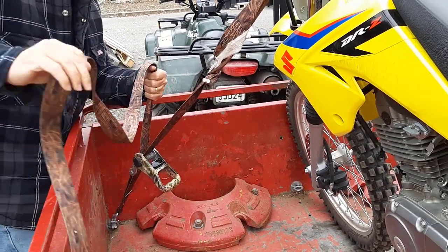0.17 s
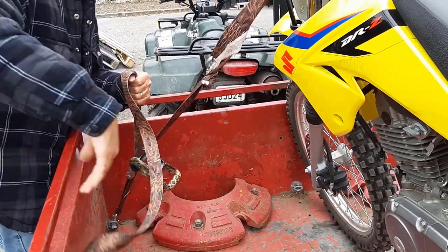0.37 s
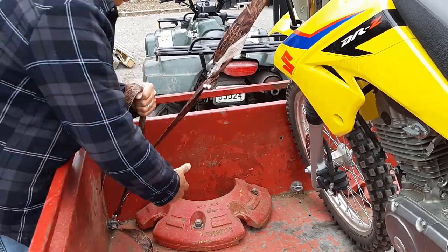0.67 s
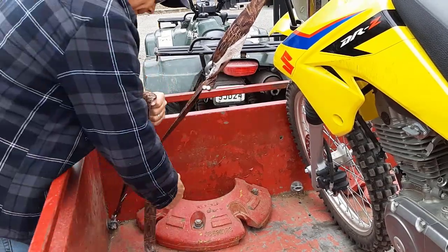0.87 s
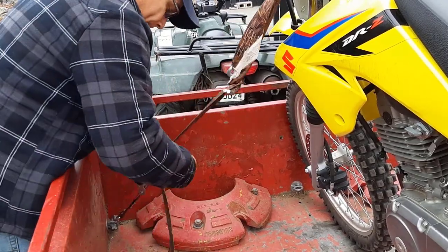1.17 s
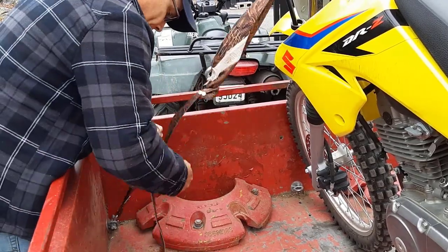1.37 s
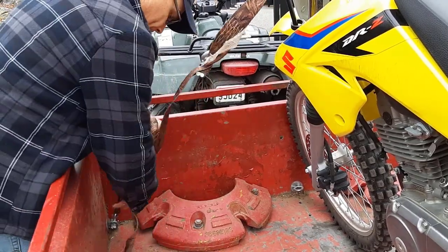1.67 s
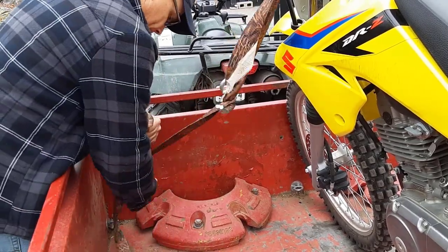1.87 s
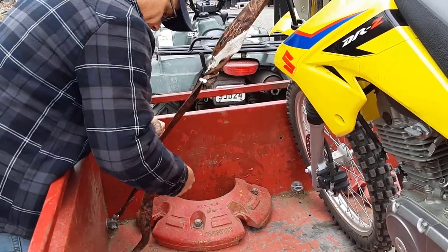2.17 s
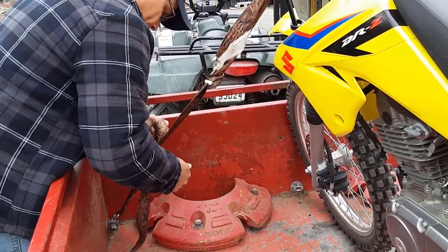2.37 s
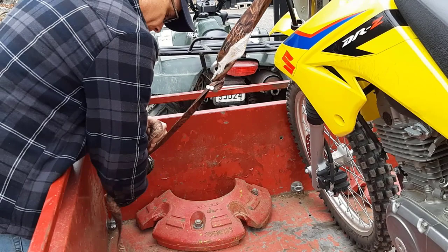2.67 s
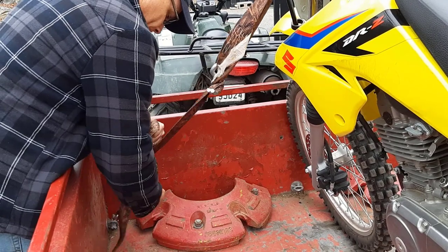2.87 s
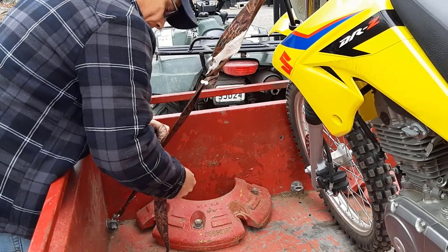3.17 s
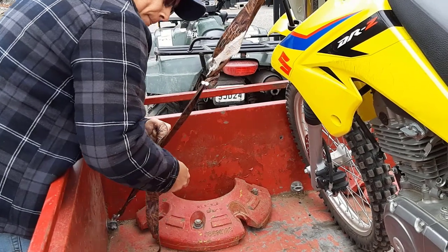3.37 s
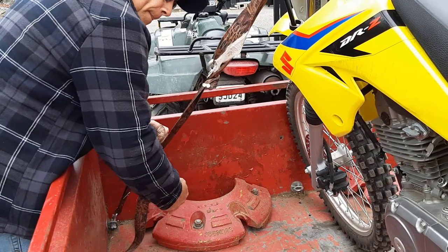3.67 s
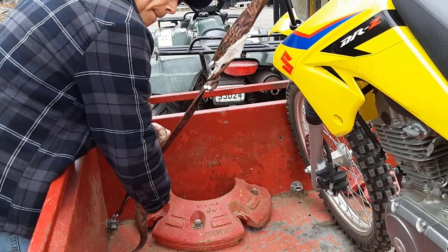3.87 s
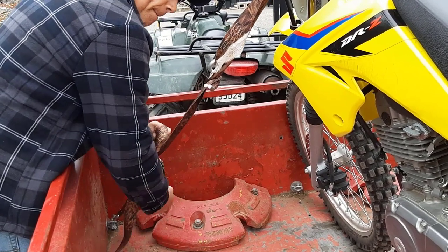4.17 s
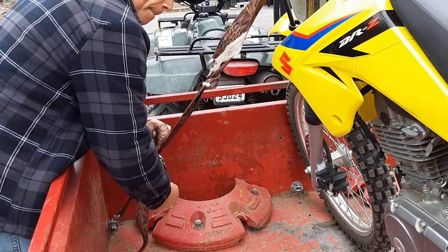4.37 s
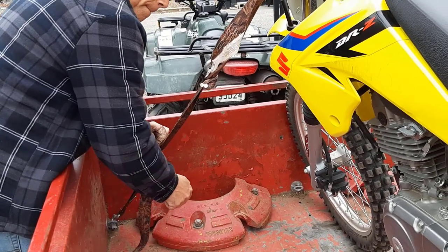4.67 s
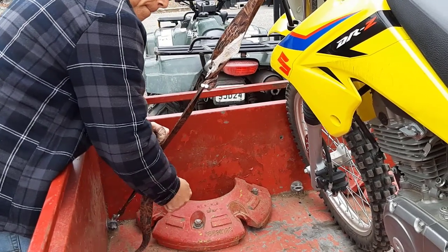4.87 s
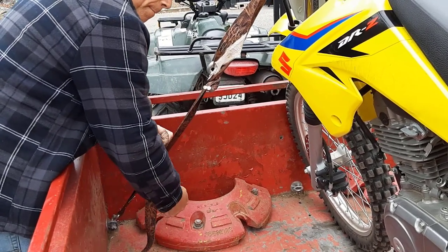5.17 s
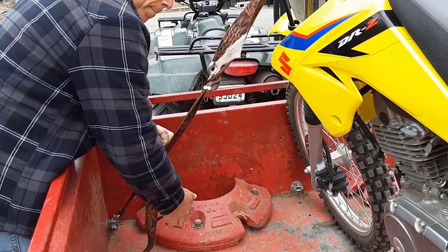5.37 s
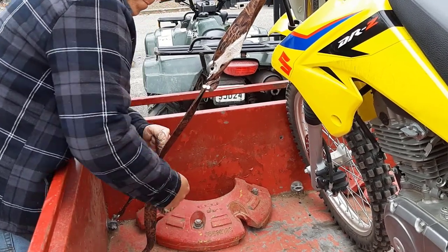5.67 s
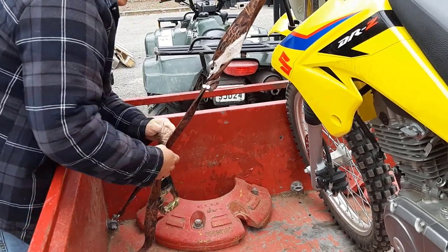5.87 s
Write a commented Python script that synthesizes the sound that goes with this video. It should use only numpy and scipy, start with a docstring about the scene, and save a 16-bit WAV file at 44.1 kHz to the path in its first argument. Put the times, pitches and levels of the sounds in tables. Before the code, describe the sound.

Outdoors in an open steel trailer, heard close in stereo with the tool toward the right. From 0 to 0.9 seconds, webbing brushes through hands in soft hissy strokes, with faint buckle taps and pings near 0.35-0.55, over low rumble and a fading metallic hum. At 0.97, 1.12 and 1.19 the ratchet snaps hard: bright, dry, chattering steel clacks, with two tiny wavering squeaks near 1.1. A pair follows at 1.7, three at 2.1-2.23, then 2.5 and a close pair around 2.63. Snaps come at 3.05, 3.23, a pair at 3.86-3.94, a weak one at 4.15 and a strong last one at 4.66. Each leaves a short steel echo, dull bed thud and faint rail ring. Sleeves rustle and light gusts flutter. After small taps around 4.9-5.1, two quiet dull bumps land at 5.15 and 5.62, left of centre, and cloth rustle returns by 6.

```python
"""Inside an open steel trailer, a hand cranks a strap ratchet, close by and louder on the right.
The pawl (a catch) snaps over the teeth: chattering noise bursts, plus dying sines for the ratchet frame.
Each jolt runs down the strap into the trailer: noise bands thud in the bed, clear sines ring in the rails.
Two short lever squeaks are wavering tones, loose hardware pings, and webbing and sleeves rustle as shaped hiss.
Steel walls echo the tool; a low outdoor rumble, light gusts and two dull bumps lie underneath."""
import sys
import numpy as np
from scipy import signal
from scipy.fft import rfft, irfft
from scipy.io import wavfile
from scipy.ndimage import uniform_filter1d

SR = 44100
rng = np.random.default_rng(int(sys.argv[2]) if len(sys.argv) > 2 else 0)


def unload_audio(sound):
    """Save the sound as a 16-bit wav file, at the path given as the first command line argument."""
    columns = np.transpose(np.atleast_2d(sound))
    # keep every value between -1 and 1, then stretch to whole-number steps
    steps = np.round(np.clip(columns, -1, 1) * 32767)
    wavfile.write(sys.argv[1], SR, steps.astype(np.int16))


N = 264820  # length in samples

# In all tables, fade time is the time to drop by 60 dB; left-right is left minus right, so negative leans right.
# Levels are relative: the mixing and the overall tone colour come after them.

# The pawl snaps over a tooth: (time [s], level [dB], treble lift [dB], jolt into the bed relative to the snap [dB],
# jolt into the rails relative to the snap [dB], left-right [dB], chatter fade time [s])
PAWL_SNAPS = [(0.9668, -7, 9, -29.5, -51, -7, .12), (1.1191, -6, 14.5, -36.5, -60.5, -8.5, .045),
              (1.1863, -7, 19.5, -28, -52.5, -5, 0.088), (1.6863, -11.5, 6.5, -33, -54.5, -5, 0.046),
              (1.709, -9, 4.5, -40, -54, -8, .076), (2.1061, -12, 7, -31.5, -52, -7, .062),
              (2.176, -11.5, 13.5, -35, -46.5, -5.5, .095), (2.2324, -9.5, 12.5, -30.5, -53, -7.5, 0.056),
              (2.5049, -12, 10, -35, -58, -6.5, 0.044), (2.6099, -11.5, 6.5, -39, -74, -4.5, .033),
              (2.6535, -15, 4.5, -33, -52, -6, 0.048), (3.0504, -9.5, 15.5, -37, -63, -6, 0.052),
              (3.2283, -13.5, 9.5, -35.5, -44.5, -6.5, 0.043), (3.8555, -10.5, 10, -31.5, -62, -6, 0.05),
              (3.9369, -10, 11, -33.5, -72, -5, 0.059), (4.152, -23.5, -3.5, -26, -55.5, -8, 0.023),
              (4.6582, -8, 8.5, -33.5, -46.5, -5, 0.053)]
# Light taps of lever, buckle and pawl:
# (time [s], level [dB], treble lift [dB], low-mid lift [dB], chatter fade time [s])
LIGHT_TAPS = [(0.3478, -39, 5, 17, .023), (0.3957, -36, 41, -3, .048), (0.4692, -44, -6, 1.5, .025),
              (0.53, -44.5, 9, 15, .04), (1.059, -48, 6.5, -0.5, .024), (1.181, -25.5, -5, -10, 0.023),
              (1.201, -23, -2.5, -2, 0.026), (1.4374, -39, -0.5, -4.4, .064), (1.4707, -47.5, -8, 3, .03),
              (1.4785, -49.5, -3, -9, 0.043), (1.735, -29.5, -2, 7.5, 0.017), (1.982, -45, -6, -4.5, .044),
              (2.068, -51.5, -10.5, 14, 0.094), (2.463, -34, 2, -4, .053), (2.9287, -36, -1.5, 13, .04),
              (3.008, -55, -7.5, 6, .057), (3.203, -48, -20, 2, .022), (3.5633, -48, -11.5, -9, .076),
              (3.6123, -43, -4.5, 6.5, .04), (3.6437, -48.5, -16.5, 8, .03), (3.804, -57.5, -6, 11.5, .058),
              (4.2062, -35.5, 6.5, 9, .04), (4.5166, -53, -11, 12.5, .036), (4.6154, -48, -11, -10, .034),
              (4.9095, -43, -4, -1, 0.044), (4.934, -44, 3.5, 9, 0.047), (5.0763, -62, -12, 28, .04)]
# Broad clack of steel on steel: (frequency [Hz], level [dB per Hz])
STEEL_CLACK = [(300, -46.5), (600, -19.5), (2200, -7.5), (3100, -4.5), (4000, -1), (5500, -4), (7000, -2),
               (9000, -5), (12000, -9), (15000, -12.5), (16700, -16)]
# Rings of the ratchet frame: (frequency [Hz], level [dB], fade time [s])
FRAME_RINGS = [(2250, -13, .02), (3450, -10, .02), (3950, -6, .02), (5200, -3, .02), (6450, -1, .025),
               (10300, -4, .022), (11600, -8, .018), (13100, -7, .018), (14700, -7, .018),
               (15350, -3, .028)]
# Dull, crowded panel modes of the trailer bed: (centre [Hz], width [Hz], level [dB], fade time [s])
BED_BANDS = [(90, 27, -10.5, 0.097), (186, 57, -4.5, 0.72), (364, 120, -6, 0.58), (546, 410, -4, 0.25),
             (820, 210, -10.5, 0.22)]
# Clear rings of the trailer rails: (frequency [Hz], level [dB], fade time [s])
RAIL_RINGS = [(805, 2.5, .3), (850, -1, .3), (1093, -4, 1.2), (1670, 1.5, .25), (1720, 3, .35),
              (1765, 3, .3), (2260, -14, .4), (2950, -6, .6), (3400, -8, .4), (3985, 4, 1.1),
              (4540, -7, .3), (5080, -11, .4), (6360, -8, .2)]
# The bed still hums from a knock just before the start: (frequency [Hz], level [dB], fade time [s])
EARLIER_KNOCK_HUM = [(163.8, -4.5, 3.1), (347, -6.5, 1.4), (442.5, 5, 0.75), (527, -6.5, 0.33),
                     (685, -11.5, .6)]
# The lever pivot slips: (start [s], length [s], loudest point [share of length], level [dB], slip rate from [Hz],
# slip rate to [Hz], second tone from the lever [dB], roughness before the ends are roughened [0-1])
PIVOT_SQUEAKS = [(1.081, .033, .45, -32, 2265, 2372, -0.5, 0.3),
                 (1.128, .052, 0.63, -31.5, 2290, 2182, -21, .15)]
# Overtones of a squeak: (multiple of the slip rate [times], level [dB])
SQUEAK_OVERTONES = [(1, 0), (2, -15), (3, -13)]
# Loose hardware touches and pings: (time [s], level [dB], frequency [Hz], fade time [s])
HARDWARE_PINGS = [(.468, -45.5, 849, 0.05), (.492, -43, 1970, 0.017), (.511, -47, 1300, 0.0082),
                  (1.541, -55, 3300, 0.027), (4.496, -63, 5100, 0.033), (4.518, -57, 3685, 0.046),
                  (4.552, -59, 5180, 0.038), (4.626, -53, 1130, 0.027), (4.913, -45, 3470, 0.1)]
# Echoes inside the trailer: (frequency [Hz], fade time [s])
WALL_ECHOES = [(500, 0.93), (2000, 0.32), (5000, 0.19), (9000, 0.21), (15000, 0.053)]
# Webbing and sleeves moving: (time [s], level [dB])
RUSTLE_LEVEL = [(.92, -70.5), (1.25, -64.5), (1.52, -81.5), (1.65, -74), (2.08, -67.5), (2.45, -81),
                (3.0, -71.5), (3.18, -73), (3.4, -81), (3.75, -92), (3.85, -74.5), (4.12, -71),
                (4.4, -85.5), (4.55, -73), (5.1, -84.5), (5.55, -86), (6., -73.5)]
# Loose webbing pulled through the hands: (start [s], length [s], level [dB])
WEBBING_STROKES = [(0.0, .07, -61), (0.076, .09, -68.5), (0.281, .26, -57.5), (0.66, .25, -65.5),
                   (0.942, .03, -54.5), (3.03, .02, -59.5), (4.183, 0.039, -57)]
# Tone colour of rubbing cloth: (frequency [Hz], level [dB per Hz])
CLOTH_COLOUR = [(700, -26.5), (1300, -14), (2400, -16.5), (4000, -14), (6000, -14.5), (8000, -9),
                (12000, -16.5), (16000, -23)]
# Air moving over the microphone ports: (time [s], level [dB])
GUST_LEVEL = [(0.0, -51), (.2, -60), (.5, -62), (.9, -52), (1.13, -55.5), (1.25, -52), (1.479, -58.5),
              (1.7, -47.5), (1.93, -58.5), (2.3, -54), (2.52, -68), (2.952, -62.5), (3.15, -51.5),
              (3.38, -54), (3.53, -46), (3.65, -59.5), (3.95, -60.5), (4.2, -69), (5.05, -64)]
# Dull low bumps: (time [s], level [dB], frequency [Hz], left-right [dB])
LOW_BUMPS = [(5.152, -46, 118, -22), (5.621, -44, 134, -17)]
# Ups and downs of the outdoor rumble: (time [s], bass level [dB], mid level [dB])
RUMBLE_LEVEL = [(0.0, -38, -46), (.35, -32.5, -42.5), (.8, -39.5, -49), (1.201, -43, -58),
                (2.1, -40.5, -60), (2.9, -45.5, -70.5), (3.4, -51.5, -59), (4.05, -41, -62.5),
                (4.55, -49, -57.5), (4.8, -43.5, -51), (5.35, -50.5, -51.5), (6.0, -49, -49)]
# Tone colour of the outdoor rumble: (frequency [Hz], level [dB per Hz])
OUTDOOR_COLOUR = [(65, -36), (110, -15), (167, -10.5), (233, -4), (293, -15.5), (409, -17.5), (688, -14.5),
                  (941, -14.5), (1580, -25.5), (2080, -37.5), (6950, -48), (13500, -46), (16000, -47)]
# How alike the rumble is on both sides: (frequency [Hz], likeness, kept within [-1 to 1])
RUMBLE_LIKENESS = [(60, -1.1), (180, 1), (550, 0.63), (1650, -0.43), (4970, -1.4), (15000, -0.02)]
# How the rumble leans to one side: (frequency [Hz], left-right [dB])
RUMBLE_LEAN = [(60, 9), (180, -0.5), (550, -2.5), (1650, -12.5), (4970, -1), (15000, 0.5)]
# Overall tone colour, several treble peaks, then a steep drop above about 15.7 kHz: (frequency [Hz], gain [dB])
OVERALL_COLOUR = [(4200, 6), (5100, 10), (5700, 7), (6550, 10), (7300, -1), (8100, -2.5), (9500, 1.5),
                  (15500, 7.5), (15900, -18.5), (16700, -18)]

SNAP_LOW_DB, SNAP_RISE_MS = -0.5, 0.89  # low-mid lift, landing time
TAP_RISE_MS, TAP_BED_DB, TAP_PAN_DB = 0.98, -18, -6.5
CRACK_DB, CRACK_T60_S = 2.5, 0.0063  # the first contact adds a brief crack in the highest treble
REBOUND_DB = 3  # how unevenly the pawl rebounds
FRAME_SPREAD_DB, FRAME_DETUNE = 2.5, .02  # chance in how a blow rings the frame: level, share of pitch
RAILS_SPREAD_DB, RAILS_DETUNE = 2.5, 0.0013  # the same for the rails
LEVER_HZ = 3010
SQUEAK_ENDS_DB, ROUGHER_ENDS = -17.5, .15  # fainter and scratchier at both ends
STROKE_RISE_DB_PER_S, STROKE_FALL_DB_PER_S = 404.5, 599.5
LEAD = 5  # samples by which the left port hears the tool earlier
AIR_PATCHES_DB = 1.5  # lumpiness of the rumble
EDGE_HZ = 16700  # upper band limit


def gain_of(db):
    """Turn decibels into a multiplying factor."""
    return 10 ** (np.asarray(db) / 20)


def evened(x):
    """Bring the average power of a sound to one."""
    return x / np.sqrt(np.mean(x ** 2) + 1e-20)


def read(points, hz):
    """Read a curve between its listed frequencies, on a logarithmic pitch scale."""
    f, value = np.transpose(points)
    return np.interp(np.log(hz + 1), np.log(f + 1), value)


def add(mix, s, sound):
    """Lay a sound into the mix at s seconds, cutting off what runs past the end."""
    part = mix[..., round(s * SR):][..., :sound.shape[-1]]
    part += sound[..., :part.shape[-1]]


def sides(pan_db):
    """Gains for left and right that differ by pan_db."""
    return gain_of([[pan_db / 2], [-pan_db / 2]])


def rings(modes, spread_db, detune, count, size):
    """Dying sines, count close neighbours per mode; every blow draws new strengths, phases and small detunings."""
    hz, db, t60 = np.repeat(modes, count, axis=0).T[:, :, None]
    t = np.arange(size) / SR
    strength, phase, shift = rng.standard_normal((3, len(hz), 1))
    fade = gain_of(db + spread_db * strength - 60 * t / t60)
    waves = np.sin(2 * np.pi * (hz * (1 + detune * shift) * t + phase))
    return (fade * waves).sum(0) / np.sqrt(count)


def noise(level_db, same, patchy_db, size):
    """Two channels of random short-time spectra; level_db(t, hz) gives the dB field, patches drift over it."""
    frames, hz = N * 4 // size + 5, np.fft.rfftfreq(size, 1 / SR)
    a, b, c, d, patches = rng.standard_normal((frames, len(hz), 5)).T
    patches = uniform_filter1d(patches, size=9, axis=0)
    patches = evened(uniform_filter1d(patches, size=9, axis=1))
    likeness = np.clip(same(hz), -1, 1)[:, None]
    left = a + 1j * b
    right = likeness * left + np.sqrt(1 - likeness ** 2) * (c + 1j * d)
    t = np.arange(frames) * size / 4 / SR
    spectra = np.array([left, right]) * gain_of(level_db(t, hz[:, None]) + patchy_db * patches)
    return signal.istft(spectra, nperseg=size, noverlap=size * 3 // 4)[1][:, :N]


def snap(peak_db, treble_db, low_db, rise_ms, t60, size=8192, wait=300):
    """The pawl lands and chatters briefly: a broad clack plus the frame's rings, heard differently at each port."""
    t, hz = (np.arange(size) - wait) / SR, np.fft.rfftfreq(2 * size, 1 / SR)
    t60, late = np.clip(t60, .01, .2), np.maximum(t, 0)

    # Strength of the chatter over time
    chatter = gain_of(-60 * late / t60)
    chatter += gain_of(-31.5 - 60 * late / (t60 + 0.07))  # loose parts settle last
    landing = (1 + np.tanh(1000 * t / np.clip(rise_ms, .1, 3))) / 2
    lead_in = gain_of(-15 + 3300 * np.minimum(t, 0))  # a soft lead-in swells up just before the landing
    chatter *= landing + (1 - landing) * lead_in
    shared, left, right, lumps = rng.standard_normal((4, size))
    rebounds = evened(uniform_filter1d(uniform_filter1d(lumps, size=30), size=30))
    chatter *= gain_of(REBOUND_DB * rebounds)
    blows = chatter * (shared + 2.0 * np.array([left, right]))

    # The same blows drive both the clack and the frame
    crack = rfft(blows * landing * gain_of(CRACK_DB - 60 * late / CRACK_T60_S), 2 * size)
    crack = crack / (1 + (9000 / (hz + 1)) ** 6)
    lift = treble_db / (1 + (8500 / (hz + 1)) ** 6) + low_db / (1 + (hz / 2600) ** 6)
    hits = (rfft(blows, 2 * size) + crack) * gain_of(lift)
    clack = evened(irfft(hits * gain_of(read(STEEL_CLACK, hz)))[:, :size])
    frame = rings(FRAME_RINGS, FRAME_SPREAD_DB, FRAME_DETUNE, count=3, size=size // 2)
    ring = evened(irfft(hits * rfft(frame, 2 * size))[:, :size])
    sound = (clack + gain_of(-4.5) * ring) * signal.windows.tukey(size, wait / size / 2)
    return gain_of(peak_db) * sound / abs(sound.mean(0)).max()


def bed(size=16384):
    """A dull thud: each crowd of panel modes is a band of noise that swells for some ms and dies."""
    t, hz = np.arange(size) / SR, np.fft.rfftfreq(size, 1 / SR)
    centre, width, db, t60 = np.transpose(BED_BANDS)[:, :, None]
    band = 1 / (1 + (2 * (hz - centre) / width) ** 2) / np.sqrt(width)
    crowds = evened(irfft(rfft(rng.standard_normal((len(BED_BANDS), size))) * band))
    thud = (crowds * gain_of(db - 60 * t / t60)).sum(0)
    return thud * (1 - np.exp(-t / 0.027)) * np.hanning(2 * size)[size:]


def rails(size=16384):
    """The jolted trailer rails ring as clear dying sines."""
    tones = rings(RAIL_RINGS, RAILS_SPREAD_DB, RAILS_DETUNE, count=1, size=size)
    return tones * np.hanning(2 * size)[size:]


def ratchet():
    """All snaps and taps, and the trailer bed and rails that they shake through the strap."""
    near, trailer = np.zeros((2, N)), np.zeros(N)
    add(trailer, 0, gain_of(-41.5) * rings(EARLIER_KNOCK_HUM, 2.7, .025, count=4, size=SR))
    for s, peak_db, treble_db, bed_db, rails_db, pan_db, t60 in PAWL_SNAPS:
        # start 6 ms early to leave room for the soft lead-in
        add(near, s - .006, snap(peak_db, treble_db, SNAP_LOW_DB, SNAP_RISE_MS, t60) * sides(pan_db))
        jolt = gain_of(bed_db) * bed() + gain_of(rails_db) * rails()
        add(trailer, s, gain_of(peak_db) * jolt)
    for s, peak_db, treble_db, low_db, t60 in LIGHT_TAPS:
        add(near, s - .006, snap(peak_db, treble_db, low_db, TAP_RISE_MS, t60) * sides(TAP_PAN_DB))
        add(trailer, s, gain_of(peak_db + TAP_BED_DB) * bed())
    return near + trailer * sides(-3.4)


def squeaks():
    """Stick-slip at the pivot: a wavering tone with overtones; where it is rough each slip also scrapes."""
    out = np.zeros(N)
    for s, length, top, peak_db, from_hz, to_hz, lever_db, rough in PIVOT_SQUEAKS:
        t = np.arange(0, length, 1 / SR)
        away = np.interp(t / length, [0, top, 1], [1, 0, 1])  # 0 at the loudest point, 1 at the ends
        rough = rough + ROUGHER_ENDS * away
        wobble, flutter, grit = rng.standard_normal((3, len(t)))
        wobble = evened(uniform_filter1d(wobble, size=50))
        flutter = evened(uniform_filter1d(flutter, size=40))
        slip_hz = np.linspace(from_hz, to_hz, len(t)) * (1 + 0.14 * rough * wobble)
        turns = np.cumsum(slip_hz) / SR
        tone = sum(gain_of(d) * np.sin(2 * np.pi * k * turns) for k, d in SQUEAK_OVERTONES)
        tone = tone + gain_of(lever_db) * np.sin(2 * np.pi * LEVER_HZ * t)
        scrape = rough * np.diff(grit, prepend=0)
        tone = tone * (1 + rough * flutter) + scrape
        level = np.sqrt(2) * gain_of(peak_db + SQUEAK_ENDS_DB * away)
        add(out, s, level * tone * signal.windows.tukey(len(t), .25))
    return out * sides(-7.0)


def pings():
    """A tiny tick, while one loose piece rings with a few unrelated overtones."""
    out, t = np.zeros(N), np.arange(6000) / SR
    for s, db, hz, t60 in HARDWARE_PINGS:
        modes = [(hz, 0, t60), (1.47 * hz, -9, .6 * t60), (1.93 * hz, -10, .45 * t60)]
        tone = rings(modes, 1.5, .012, count=3, size=len(t))
        tick = np.diff(rng.standard_normal(len(t)), prepend=0) * gain_of(-17 - 60 * t / .03)
        add(out, s, gain_of(db) * (tone + tick) * (1 - np.exp(-t / 0.00037)))
    return out * sides(-9.5)


def walls(x):
    """Sparse echoes of random sign off the steel sides, each band dying at its own speed."""
    echoes = np.zeros((2, SR // 2))
    # one echo at a random spot in every 20 samples
    at = np.arange(200, SR // 2 - 20, 20) + rng.integers(0, 20, (2, (SR // 2 - 201) // 20))
    np.put_along_axis(echoes, at, rng.choice([-1., 1.], at.shape), 1)
    hz, t, spectra = signal.stft(echoes, SR, nperseg=256)
    fade = gain_of(-60 * t / read(WALL_ECHOES, hz)[:, None])
    tail = signal.istft(spectra * fade, SR, nperseg=256)[1]
    return signal.fftconvolve(x, tail / np.linalg.norm(tail[0]), axes=1)[:, :N]


def rustle():
    """Fibres scraping: hiss that flickers in all bands at once; strokes of the webbing swell, hold and stop."""
    def field(t, hz):
        return read(CLOTH_COLOUR, hz) + 0.73 * rng.standard_normal(len(t))

    hiss = evened(noise(field, lambda hz: 0.3 + 0 * hz, 2.6, size=256))
    t = np.arange(N) / SR
    level_db = np.interp(t, *np.transpose(RUSTLE_LEVEL))
    for s, length, db in WEBBING_STROKES:
        before, after = np.maximum(s - t, 0), np.maximum(t - s - length, 0)
        edges_db = STROKE_RISE_DB_PER_S * before + STROKE_FALL_DB_PER_S * after
        level_db = np.maximum(level_db, db - edges_db)
    return hiss * gain_of(level_db) * sides(-8.0)


def gusts():
    """Moving air makes a lumpy low flutter, mostly unrelated at the two ports."""
    def field(t, hz):  # strongest around 70 to 125 Hz
        return -10 * np.log10(1 + (hz / 125) ** 8 + (70 / (hz + 1)) ** 8) + 0 * t

    flutter = evened(noise(field, lambda hz: 0.16 + 0 * hz, 2.0, size=2048))
    level_db = np.interp(np.arange(N) / SR, *np.transpose(GUST_LEVEL))
    return flutter * gain_of(level_db) * sides(1.9)


def thumps():
    """Dull bumps: about two cycles of a low sine that swell and fade."""
    out = np.zeros((2, N))
    for s, db, hz, pan_db in LOW_BUMPS:
        cycles = np.arange(0, 2.2 / hz, 1 / SR) * hz
        push = np.sin(2 * np.pi * cycles) * np.hanning(len(cycles))
        add(out, s, gain_of(db) * push * sides(pan_db))
    return out


def outdoors():
    """Far rumble of shaped noise: bass and mid follow their own levels, the faint treble stays."""
    s, bass_db, mid_db = np.transpose(RUMBLE_LEVEL)

    def field(t, hz):
        bass, treble = 1 / (1 + (hz / 600) ** 4), 1 / (1 + (2300 / (hz + 1)) ** 8)
        level = bass * np.interp(t, s, bass_db) + (1 - bass) * np.interp(t, s, mid_db)
        return read(OUTDOOR_COLOUR, hz) + (1 - treble) * level + treble * -54

    air = noise(field, lambda hz: read(RUMBLE_LIKENESS, hz), AIR_PATCHES_DB, size=1024)
    lean = read(RUMBLE_LEAN, np.fft.rfftfreq(N, 1 / SR)) / 2
    return gain_of(-9.5) * irfft(rfft(air) * gain_of([lean, -lean]), N)


def scene():
    """The tool and its echoes, over cloth, air, bumps and the far rumble."""
    tool = ratchet() + squeaks() + pings()
    tool[1] = np.roll(tool[1], LEAD)  # the right side hears it later
    echoes = gain_of(-15.0) * walls(tool)
    return tool + echoes + rustle() + gusts() + thumps() + outdoors()


def record(dry):
    """An overall tone colour shapes everything, the loudest peaks round off at full scale; then the band limit."""
    colour = gain_of(read(OVERALL_COLOUR, np.fft.rfftfreq(N, 1 / SR)))
    rounded = np.tanh(irfft(rfft(dry) * colour, N))
    band_limit = signal.firwin(511, EDGE_HZ, window=("kaiser", 9), fs=SR)
    return signal.oaconvolve(rounded, band_limit[None], "same")


dry = scene()
out = record(dry)
unload_audio(out)
```